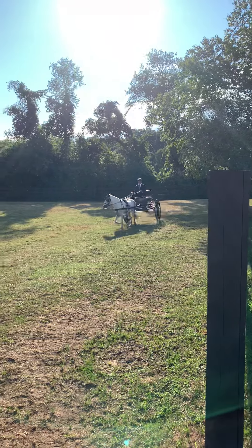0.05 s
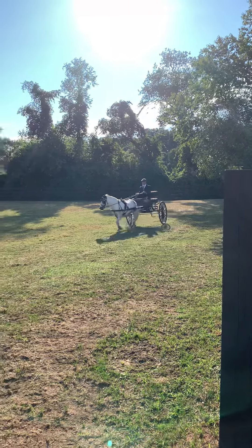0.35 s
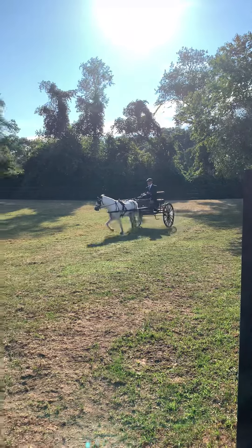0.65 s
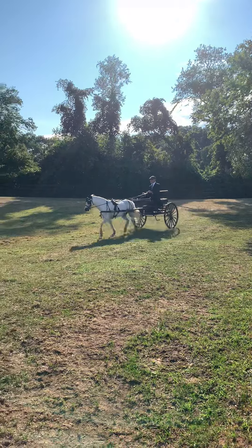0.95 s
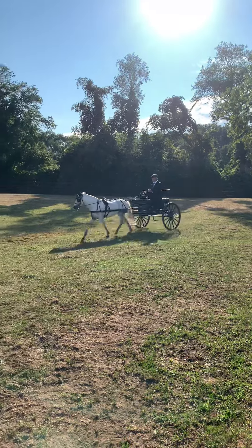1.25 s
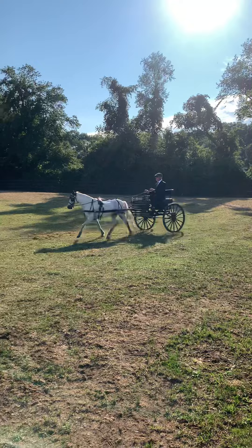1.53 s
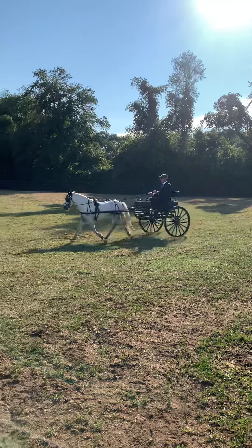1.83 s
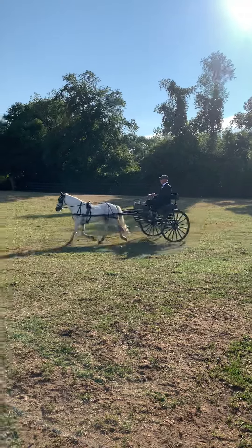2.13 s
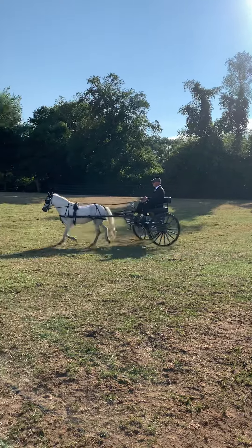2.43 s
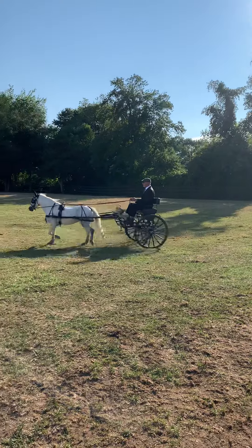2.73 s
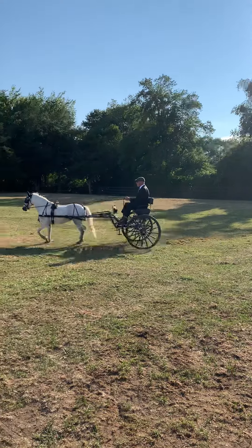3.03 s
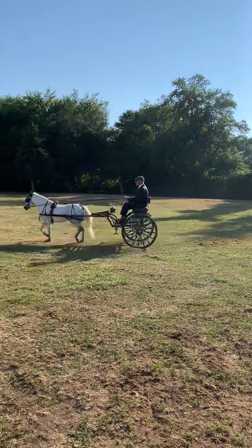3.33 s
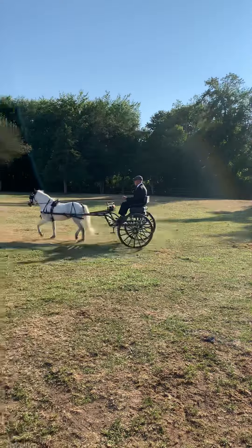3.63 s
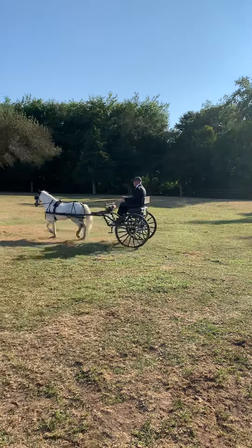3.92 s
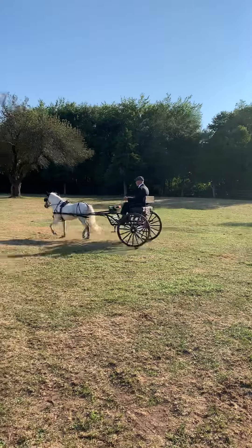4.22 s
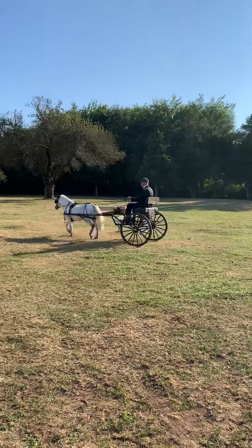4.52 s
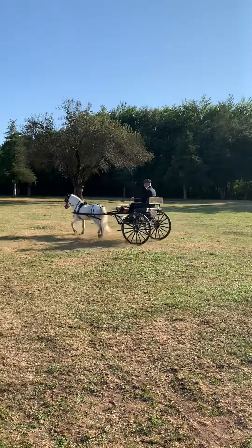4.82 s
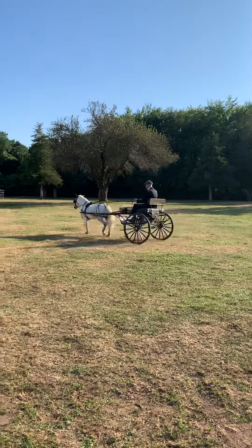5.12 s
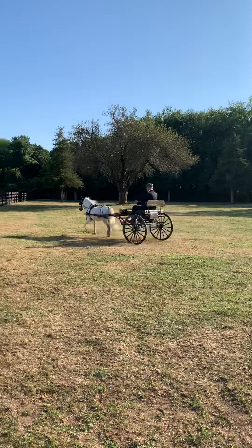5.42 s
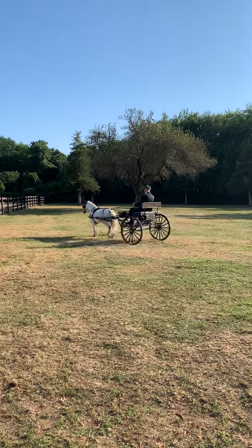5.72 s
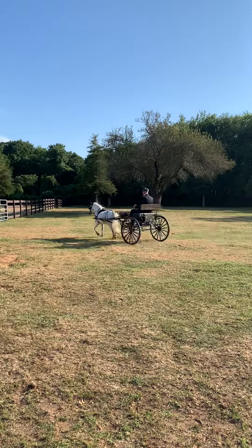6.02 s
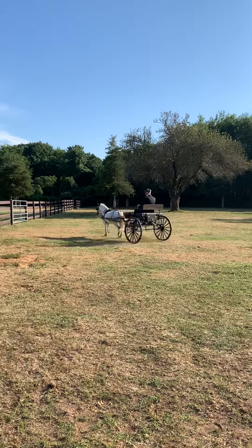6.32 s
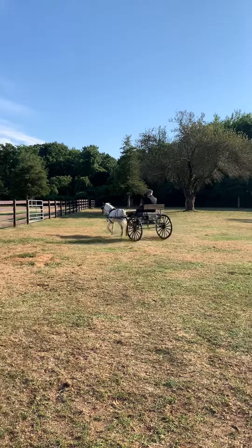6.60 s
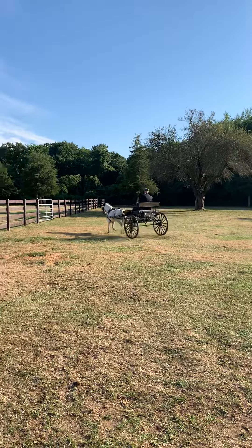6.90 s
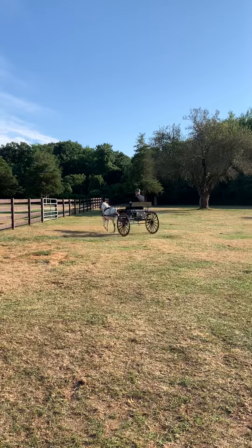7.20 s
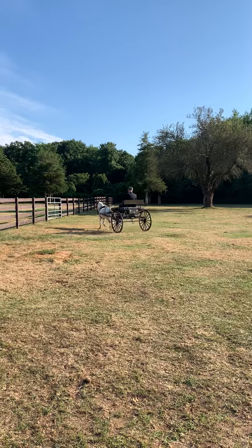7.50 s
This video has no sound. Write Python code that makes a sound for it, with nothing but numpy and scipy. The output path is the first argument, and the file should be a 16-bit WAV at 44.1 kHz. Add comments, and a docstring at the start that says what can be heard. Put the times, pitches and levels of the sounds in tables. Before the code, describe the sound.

Dull trotting hoof thuds, rattling cart knocks and chinking harness rings cross an open field while insects hiss softly.

```python
"""Pony and cart in a dry field

A pony trots at an even pace, drawing a two-wheeled cart past a hand-held microphone.
Every step thuds on the turf, shakes the harness rings and sets the cart clattering.
Dry stalks snap under hooves and wheels; bumps add harder knocks, thumps and spring squeaks.
Insects hiss in the hedges over a low outdoor rumble."""
import sys
import numpy as np
from scipy import signal
from scipy.fft import rfft, irfft
from scipy.io import wavfile
from scipy.ndimage import uniform_filter1d

SR = 44100
rng = np.random.default_rng(int(sys.argv[2]) if len(sys.argv) > 2 else 0)


def inscribe(sig):
    """Save sig as 16-bit PCM at rate SR to the path in sys.argv[1].

    A 1-D sig is mono; a 2-D sig holds one channel per row.
    Samples are clipped to [-1, 1] before scaling.
    """
    pcm = np.round(np.clip(np.atleast_2d(sig).T, -1, 1) * 32767)
    wavfile.write(sys.argv[1], SR, pcm.astype(np.int16))


N = 332955
TIME = np.arange(N) / SR
FIRST_STEP_S, STEP_S = 0.08, 0.3

# How heavily pony and cart sound on the turf. Each row: time in seconds, level in dB.
TURF_LEVEL = [(0, -50.5), (0.5, -45.5), (1.3, -49), (2.1, -47.5), (2.7, -50), (4.3, -54.5), (4.7, -52.5),
              (5.3, -52), (6, -55), (7.55, -51)]
# How loudly the wheels roll on rough and smooth ground. Each row: time in seconds, level in dB.
WHEEL_LEVEL = [(0.0, -67.5), (0.35, -59), (1.7, -57.5), (2.25, -63.5), (2.47, -53), (2.67, -76),
               (3.07, -55), (3.8, -59), (6.1, -69), (6.22, -58.5), (7.55, -69.5)]


def gain_of(db):
    """Turns decibels into a number to multiply by."""
    return 10 ** (np.asarray(db) / 20)


def evened(x):
    """Scales a sound to an average strength (rms) of 1."""
    return x / np.sqrt(np.mean(x ** 2) + 1e-20)


def peaked(x):
    """Scales a sound to a peak of 1."""
    return x / (abs(x).max() + 1e-20)


def at_hz(points, hz):
    """Reads a table between its frequencies, on a scale of octaves."""
    known_hz, value = np.transpose(points)
    return np.interp(np.log(hz + 1), np.log(known_hz + 1), value)


def level(curve, s):
    """Reads a level curve at the times s."""
    return np.interp(s, *np.transpose(curve))


def add(mix, s, sound):
    """Adds a sound into the mix at s seconds."""
    part = mix[max(round(s * SR), 0):][:len(sound)]
    part += sound[:len(part)]


def coloured(x, tone):
    """Turns each frequency up or down as the tone table says."""
    return irfft(rfft(x) * gain_of(at_hz(tone, np.fft.rfftfreq(N, 1 / SR))), N)


def drift(per_s):
    """A wandering curve that heads for a new random value per_s times a second."""
    targets = rng.standard_normal(1000)
    return evened(np.interp(TIME * per_s, np.arange(len(targets)), targets))


def stereo_noise(n, likeness):
    """Left and right noise: unrelated at likeness 0, the same at 1."""
    left, other = rng.standard_normal((2, n))
    return np.array([left, likeness * left + np.sqrt(1 - likeness ** 2) * other])


def arch(t, length, crest):
    """Swells and fades within length; a crest under 1 makes it peak early."""
    return np.sin(np.pi * np.minimum(t / length, 1) ** crest)


def random_kicks(n, per_s, spread_db, cap):
    """Spikes at random moments: many small, a few large."""
    sizes = gain_of(spread_db * np.minimum(rng.exponential(1, n), cap))
    return sizes * (rng.random(n) < per_s / SR)


def steps(lag_s, scatter_s, count=1):
    """Times of count events for each step of the trot, scattered around a short delay."""
    beat = np.repeat(FIRST_STEP_S + STEP_S * np.arange(25), count)
    return np.maximum(beat + lag_s + scatter_s * rng.standard_normal(len(beat)), 0)


def insects(level_db=-64.0, flutter_db=3.0):
    """A far chorus of many insects merges into a lightly fluttering hiss."""
    # The tone of the chorus. Each row: frequency in Hz, level in dB.
    tone = [(1500, -11), (3000, -11.5), (4200, -3), (5000, -6.5), (6200, -5), (7250, -5.5), (7620, 2.5),
            (7950, -2), (8400, -15), (10500, -11), (12500, -17), (15000, -21)]
    chorus = evened(coloured(stereo_noise(N, likeness=1.0), tone))
    return chorus * gain_of(level_db + flutter_db * drift(per_s=40))


def rumble(lump_db=3.5):
    """A lumpy low roll from the turf."""
    # The tone of the rumble. Each row: frequency in Hz, level in dB.
    tone = [(12, -40), (28, -14.5), (48, -2.5), (85, 2.5), (115, -4.5), (200, -7), (330, -15), (480, -29),
            (1000, -28.5), (3000, -59)]
    ground = evened(coloured(stereo_noise(N, likeness=0.92), tone))
    return ground * gain_of(level(TURF_LEVEL, TIME) + lump_db * np.tanh(drift(per_s=18)))


def wheels(clump_db=8.0, crunch_db=-3.0):
    """The rims crush clumps of dry grass."""
    # The tone of the crunch. Each row: frequency in Hz, level in dB.
    tone = [(150, 9.5), (330, 6.5), (460, 4), (620, 8), (780, 8), (1000, -3), (1600, 2), (2400, -7),
            (4000, -31), (6500, -15.5), (9000, -15.5), (12000, -34), (16000, -60)]
    stalks = random_kicks(N, per_s=600, spread_db=3.0, cap=4)
    crush = np.sqrt(abs(uniform_filter1d(stalks ** 2, size=160)))  # each gives way in a few milliseconds
    crunch = evened(coloured(crush * stereo_noise(N, likeness=0.88), tone))
    return crunch * gain_of(level(WHEEL_LEVEL, TIME) + crunch_db + clump_db * np.tanh(drift(per_s=40)))


def twigs(snap_s=0.0071, level_db=-15.5):
    """Stiff stems snap one by one under hooves and rims."""
    # The tone of the stems. Each row: frequency in Hz, level in dB.
    tone = [(500, -5), (900, 0), (1700, 0), (2400, 0), (3400, -6.5), (5000, -34), (7000, -0.5),
            (10000, -15.5), (12500, -39), (15000, -38)]
    breaks = random_kicks(N, per_s=45, spread_db=5.5, cap=2.5)
    fades = signal.lfilter([1], [1, -np.exp(-1 / (snap_s * SR))], breaks)
    snaps = evened(coloured(fades * rng.standard_normal(N), tone))
    return snaps * gain_of(level(TURF_LEVEL, TIME) + level_db)


def scrapes(level_db=8.5):
    """Hooves and rims drag through dry grass, making clumps of tiny cracks."""
    # The drags. Each row: start in seconds, length in seconds, relative level in dB.
    drags = [(0.439, 0.041, -49), (0.798, 0.044, -53), (0.894, 0.2, -53), (1.11, 0.1, -60),
             (5.031, 0.061, -50.5), (6.534, 0.13, -63.5), (6.967, 0.19, -64), (7.232, 0.051, -49.5),
             (7.298, 0.12, -51.5)]
    # The tone of dry grass. Each row: frequency in Hz, level in dB.
    tone = [(600, -20), (1500, -6.5), (2800, -6), (3100, -10), (3800, -7), (5000, -18), (7000, -16),
            (10000, -25), (13000, -36)]
    out, t = np.zeros(N), np.arange(8192) / SR
    for s, length, db in drags:
        breaks = random_kicks(len(t), per_s=900, spread_db=4.0, cap=3)
        cracks = np.sqrt(abs(uniform_filter1d(breaks ** 2, size=110))) * rng.standard_normal(len(t))
        scrape = evened(cracks * arch(t, length, crest=0.4))
        add(out, s, gain_of(db + level_db) * np.sqrt(length / t[-1]) * scrape)
    return coloured(out, tone)


def ticks(crack_s=0.0048, tail_s=0.023, level_db=10.5):
    """Buckles and dry stalks snap without ringing: a crack and a brief faint fizz."""
    # The sharpest snaps. Each row: start in seconds, relative level in dB.
    snaps = [(0.113, -44), (0.6482, -34), (0.9727, -41), (1.264, -38.5), (1.6, -50), (1.823, -44),
             (2.18, -46), (2.276, -52), (2.371, -43), (2.459, -47), (2.843, -34.5), (3.349, -45.5),
             (3.396, -51), (3.527, -52), (3.631, -60), (3.672, -43), (4.287, -46.5), (4.312, -49),
             (4.474, -47), (5.197, -45), (6.0875, -40), (7.232, -42), (7.464, -44)]
    # Their tone. Each row: frequency in Hz, boost or cut in dB.
    tone = [(1500, 5), (3000, 0), (5000, 2), (9000, -5.5), (12000, -5), (16000, -24)]
    out, t = np.zeros(N), np.arange(2000) / SR
    fade = np.exp(-(t / crack_s) ** 2) + np.exp(-t / tail_s) / 10
    for s, db in snaps:
        add(out, s, gain_of(db + level_db) * peaked(rng.standard_normal(len(t)) * fade))
    return coloured(out, tone)


def springs(sag=0.019, rasp=0.017, overtone_db=-22, grit_db=-11, level_db=-4.0):
    """The cart sways and a spring leaf slips unevenly: a gritty whistle that sags in pitch."""
    # The squeaks. Each row: start in seconds, length in seconds, pitch in Hz, relative level in dB.
    squeaks = [(1.397, 0.011, 3646, -40.5), (1.432, 0.039, 3470, -38.5), (1.712, 0.042, 3640, -38.5),
               (1.944, 0.014, 3550, -36.5), (2.019, 0.018, 3590, -35), (2.274, 0.091, 3290, -55),
               (2.573, 0.025, 3520, -42.5), (2.732, 0.056, 3100, -60.5), (2.816, 0.022, 3400, -36.5),
               (3.058, 0.018, 3440, -41.5), (3.38, 0.016, 3700, -36.5), (3.816, 0.022, 3470, -47),
               (3.83, 0.036, 3870, -48), (3.847, 0.021, 3380, -43), (4.037, 0.02, 3400, -46),
               (4.515, 0.014, 3500, -39.5), (4.733, 0.0086, 3574, -41), (5.666, 0.032, 3020, -49.5),
               (5.69, 0.042, 2550, -51), (6.54, 0.024, 3350, -57), (6.627, 0.028, 3500, -52.5),
               (6.865, 0.023, 3780, -50.5)]
    out = np.zeros(N)
    for s, length, hz, db in squeaks:
        progress = np.linspace(0, 1, max(int(length * SR), 100))
        n = len(progress)
        jitter, slips = (evened(uniform_filter1d(row, size=70)) for row in rng.standard_normal((2, n)))
        pitch_hz = hz * (1 + sag * (0.5 - progress) + rasp * jitter)
        phase = 2 * np.pi * np.cumsum(pitch_hz) / SR
        whistle = np.sin(phase) + gain_of(overtone_db) * np.sin(2 * phase)
        band = signal.butter(2, [0.78 * hz, 1.12 * hz], "bandpass", fs=SR)
        grit = evened(signal.lfilter(*band, rng.standard_normal(n)))
        swell = np.sin(np.pi * progress) * (1 + 0.35 * slips)
        add(out, s, gain_of(db + level_db) * swell * (whistle + gain_of(grit_db) * grit))
    return out


def harness(touches_per_s=85, flutter_db=8.0, wander=1.34, build_s=0.0011, low_db=-1.0, high_db=4.5):
    """A shake makes the steel rings touch many times; each touch rings unevenly and a bit off pitch."""
    # Single shakes of the harness, loud and faint. Each row: start and length in seconds, relative level in dB,
    # extra treble in dB.
    shakes = [(0.157, 0.1, -53.5, -10.5), (0.337, 0.045, -54, -24), (0.608, 0.14, -54, -11.5),
              (0.707, 0.062, -48, -5), (0.773, 0.08, -57, -3), (0.94, 0.09, -53.5, 0),
              (1.253, 0.044, -42.5, -11.5), (1.485, 0.091, -66, 1), (1.802, 0.085, -46.5, -6),
              (2.016, 0.081, -52, -16), (2.226, 0.03, -74, 11), (2.339, 0.11, -49, -10),
              (2.455, 0.018, -40.5, -12), (2.562, 0.062, -45, -8.5), (2.867, 0.069, -49, -9),
              (3.092, 0.057, -56.5, 5.5), (3.429, 0.081, -60.5, 1.5), (3.602, 0.041, -56, -18),
              (4.003, 0.25, -59.5, -3), (4.223, 0.055, -52.5, -9.5), (4.601, 0.21, -53.5, -13),
              (4.794, 0.11, -56, -17), (5.197, 0.16, -56, -22), (5.389, 0.2, -55, -10.5),
              (5.879, 0.15, -53.5, -13), (6.47, 0.094, -63, -29), (6.6, 0.021, -57, -10.5),
              (7.09, 0.05, -59, -9)]
    # The rings' notes. Each row: pitch in Hz, relative level in dB, seconds to fade by 60 dB.
    notes = [(3440, -20, 0.071), (4064, -0.5, 0.13), (4227, 7, 0.04), (4323, 6.5, 0.046),
             (9350, 4.5, 0.079), (9530, 4.5, 0.039), (11200, 9, 0.07), (11500, 1, 0.029),
             (14770, -7.5, 0.055)]
    # The rings also swing lightly at every step.
    swings = [(s, 0.12, level(TURF_LEVEL, s) - 13.5, -9.5) for s in steps(lag_s=0.018, scatter_s=0.024)]
    out, t = np.zeros(N), np.arange(14000) / SR
    for s, length, db, treble_db in shakes + swings:
        count = 1 + int(length * touches_per_s)
        when = length * (np.arange(count) + rng.random(count)) / count
        force = arch(when, length, crest=0.53)
        when[0], force[0] = 0.005, 0.91  # the chink that starts the shake
        lower, upper = np.zeros((2, len(t)))
        for hz, note_db, fade_s in notes:
            age = t[:int(fade_s * SR)]
            fade = gain_of(note_db - 60 * age / fade_s) * (1 - np.exp(-age / build_s))
            for at, push, (size, shift) in zip(when, force, rng.standard_normal((count, 2))):
                pitch_hz = hz + wander * shift / fade_s  # short notes stray further
                note = fade * np.sin(2 * np.pi * pitch_hz * age)
                add(lower if hz < SR / 8 else upper, at, push * gain_of(flutter_db * size) * note)
        jingle = gain_of(low_db) * evened(lower) + gain_of(treble_db + high_db) * evened(upper)
        add(out, s, gain_of(db) * np.sqrt(length / t[-1]) * jingle)
    return out


def footfalls(above_db=2.0, spread_db=4.0, thud_hz=150.0, octaves=0.32):
    """A fore and a hind hoof land almost together at each step; lists time, level and pitch."""
    s = steps(lag_s=0.01268, scatter_s=0.018, count=2)
    size, soil = rng.standard_normal((len(s), 2)).T
    db = level(TURF_LEVEL, s) + above_db + spread_db * size
    return list(zip(s, db, thud_hz * 2 ** (octaves * soil)))


def hooves(cycles=0.61, scuff=0.36, level_db=2.5):
    """Each hoof pushes the soil into a few dull wobbles, with a scuff of loose earth."""
    # Heavy thuds on the turf. Each row: start in seconds, relative level in dB, pitch in Hz.
    heavy_thuds = [(0.107, -41, 317), (0.279, -36, 89), (0.429, -35.5, 322), (0.689, -47, 83.5),
                   (0.934, -40, 98), (1.523, -41.5, 57.5), (1.687, -35.5, 145), (1.825, -38, 78),
                   (1.903, -41.5, 159), (1.995, -34, 57), (2.205, -40, 156), (2.458, -31.5, 170),
                   (2.487, -32.5, 155), (2.537, -34, 158), (2.897, -37, 150), (3.027, -38, 148),
                   (5.821, -43, 60), (6.1, -39.5, 157)]
    out, t = np.zeros(N), np.arange(8192) / SR
    soil = signal.butter(2, [90, 380], "bandpass", fs=SR, output="sos")
    for s, db, hz in heavy_thuds + footfalls():
        earth = evened(signal.sosfilt(soil, rng.standard_normal(len(t))))
        thud = (np.sin(2 * np.pi * hz * t) + scuff * earth) * t * np.exp(-t * hz / cycles)
        add(out, s, gain_of(db + level_db) * peaked(thud))
    return out


def clatter(above_db=10.0, spread_db=-1.5, lowest_hz=770.0, octaves=1.6):
    """Small knocks gather around each step, louder on rough ground; lists time, level and pitch."""
    s = steps(lag_s=0.02, scatter_s=0.065, count=7)
    size, place = rng.random((len(s), 2)).T
    db = level(WHEEL_LEVEL, s) + above_db + spread_db * size
    return list(zip(s, db, lowest_hz * 2 ** (octaves * place ** 2)))


def clack(age, centre_hz, lead_s=0.0027, swell_s=0.0032, top_hz=2087.0):
    """The faces of two boards meet: a woody burst of noise with no clear pitch."""
    progress = np.maximum(age + lead_s, 0) / swell_s
    bottom_hz = min(0.85 * centre_hz, top_hz / 1.45)
    wood = signal.butter(4, [bottom_hz, top_hz], "bandpass", fs=SR, output="sos")
    burst = signal.sosfilt(wood, rng.standard_normal(len(age)) * progress * np.exp(-progress))
    return burst * np.sqrt(SR / 100) / np.linalg.norm(burst)


def cart_body(t, centre_hz, focus_db, detune=0.014, rise_s=0.002, dull_hz=2950.0):
    """The boards ring; where the blow lands favours notes near one pitch and shifts each a little."""
    # The body's notes. Each row: pitch in Hz, width in Hz (wider fades sooner), relative level in dB.
    notes = [(162, 13.4, -1), (337.5, 32, 1), (640, 207, -2.5), (770, 110, -2), (872, 65, -1),
             (1134, 90, -6), (1200, 65, -10), (1377, 310, -4), (1541, 310, -2.5), (1658, 210, -5.5),
             (2120, 105, -8), (2630, 320, -5.5), (2750, 130, -10), (3650, 400, -6)]
    ring = np.zeros(len(t))
    for hz, width, db in notes:
        octaves_away = min(abs(np.log2(hz / centre_hz)), 1)
        weight = width * gain_of(db - focus_db * octaves_away)
        pitch_hz = hz * (1 + detune * rng.standard_normal())
        ring += weight * np.exp(-np.pi * width * t) * np.sin(2 * np.pi * (pitch_hz * t + rng.random()))
    ring *= 1 - np.exp(-t / rise_s)  # the blow needs a moment to spread through the boards
    return signal.lfilter(*signal.butter(2, dull_hz, fs=SR), ring)  # soft wood dulls the treble


def cart_knocks(graze_s=0.0023, contact_s=0.0043, rattle_s=0.025, chatter=0.062,
                usual_db=-37.5, clack_db=-10.0, level_db=-9.0):
    """Loose wooden parts graze, land with a clack that rings the cart body, and rattle on."""
    # Knocks from bumps. Each row: time in seconds, relative level in dB, favoured pitch in Hz.
    bumps = [(0.095, -39.5, 880), (0.337, -38, 890), (0.387, -38.5, 1130), (0.428, -24.5, 1030),
             (0.459, -34, 1080), (0.555, -41, 750), (0.641, -35.5, 800), (0.69, -54, 900),
             (0.835, -38.5, 1530), (0.903, -38.5, 795), (0.932, -32, 1230), (0.972, -29.5, 1010),
             (1.016, -35.5, 900), (1.236, -27.5, 1060), (1.332, -36.5, 830), (1.426, -49.5, 1400),
             (1.491, -40, 1070), (1.614, -36.5, 1490), (1.641, -40.5, 884), (1.691, -37, 1130),
             (1.71, -24, 1060), (1.778, -34, 1250), (1.818, -35, 840), (1.946, -27, 1370),
             (1.994, -26, 840), (2.026, -25, 1130), (2.134, -34, 786), (2.232, -34, 1190),
             (2.268, -33, 776), (2.302, -28.5, 824), (2.369, -27, 810), (2.416, -31.5, 750),
             (2.437, -27.5, 1210), (2.462, -44, 800), (2.491, -27, 820), (2.521, -28.5, 767),
             (2.537, -34.5, 1000), (2.567, -40, 895), (2.584, -30, 790), (2.635, -37, 835),
             (2.828, -34, 1200), (2.842, -18, 840), (2.872, -38, 1400), (2.889, -27, 796),
             (2.91, -32.5, 756), (2.954, -30.5, 810), (2.997, -23.5, 1530), (3.025, -44, 1530),
             (3.062, -34, 745), (3.089, -41, 756), (3.362, -39, 750), (3.409, -33, 774), (3.531, -40, 850),
             (3.578, -32.5, 780), (3.598, -33, 770), (3.673, -25.5, 805), (3.714, -35, 820),
             (3.936, -41, 830), (3.961, -29, 810), (4.037, -36, 740), (4.13, -28, 900), (4.198, -29, 872),
             (4.22, -50, 1100), (4.26, -39.5, 860), (4.294, -33, 860), (4.454, -44, 870), (4.48, -40, 870),
             (4.602, -31.5, 865), (4.629, -38, 845), (4.811, -38, 744), (4.913, -43.5, 860),
             (4.933, -37.5, 675), (5.039, -38.5, 700), (5.205, -42, 1510), (5.228, -33, 800),
             (5.24, -39, 1100), (5.3, -44, 1150), (5.764, -43.5, 1730), (5.796, -34.5, 870),
             (5.824, -40.5, 1300), (6.09, -30.5, 1520), (6.151, -33, 744), (6.25, -37.5, 720),
             (6.264, -39, 1290), (6.339, -32.5, 765), (6.397, -32, 790), (6.689, -35.5, 704),
             (6.777, -42, 855), (6.835, -40.5, 704), (6.973, -37.5, 675), (6.992, -41, 1490),
             (7.038, -34, 740), (7.229, -36, 755), (7.307, -47, 1700), (7.331, -35.5, 740),
             (7.37, -40, 619), (7.466, -37.5, 790)]
    out, t = np.zeros((2, N)), np.arange(8192) / SR
    landing = SR // 250  # samples of grazing before the part lands
    age = t - landing / SR
    contact = np.exp(np.minimum(age, 0) / graze_s - (np.maximum(age, 0) / contact_s) ** 2)
    for s, db, centre_hz in list(bumps) + clatter():
        hard_db = max(db - usual_db, 0)  # a hard blow wakes more notes and stands out from its rattle
        blow = chatter * rng.standard_normal(len(t)) * contact
        blow[landing] += 1
        rattle_fade = (age > 0) * gain_of(-4.5 - 0.48 * hard_db) * np.exp(-t / rattle_s)
        rattle = chatter * rattle_fade * stereo_noise(len(t), likeness=0.69)
        ring = cart_body(t, centre_hz, focus_db=14.0 - 0.19 * hard_db)
        knock = signal.fftconvolve(blow + rattle, ring[None], axes=1)[:, :len(t)]
        knock /= knock[:, landing:landing + SR // 100].std()  # strength 1 just after landing
        knock += gain_of(clack_db) * clack(age, centre_hz)
        for channel, sound in zip(out, knock):
            add(channel, s - landing / SR, gain_of(db + level_db) * sound)
    return out


def field_echo(x, fade_s=0.15, echo_db=-11.0):
    """Turf and hedges scatter a faint dull echo, different on the left and right."""
    t = np.arange(SR // 2) / SR
    tail = rng.standard_normal((2, len(t))) * gain_of(-60 * t / fade_s)
    tail = signal.lfilter(*signal.butter(1, 4000, fs=SR), tail)
    tail /= np.linalg.norm(tail[0])
    return x + gain_of(echo_db) * signal.fftconvolve(x, tail, axes=1)[:, :N]


def scene():
    """Pony and cart in the open field; only the short sounds get an echo."""
    short_sounds = cart_knocks() + harness() + ticks() + scrapes() + twigs() + springs() + hooves()
    return field_echo(short_sounds) + wheels() + rumble() + insects()


def record(dry, top_hz=15900):
    """The microphone's two openings differ in timing and level; the highest treble is cut off."""
    # How far the left wave runs ahead. Each row: frequency in Hz, lead in radians.
    left_lead = [(390, -.1), (620, -2.8), (740, -5.1), (1100, -6.2), (1400, -5.4), (2150, -5.2),
                 (2400, -3.3), (2800, -5.4), (4100, -5.1), (4800, -3.4), (5400, -3.0), (7700, -.1),
                 (9000, .1), (11700, 3.1), (13500, 3.2), (15000, 6.1)]
    # The balance of the two sides. Each row: frequency in Hz, left minus right in dB.
    balance = [(60, 0), (260, -5), (430, 0), (700, -8), (980, -2.5), (1250, -5.5), (1550, 0.5), (2200, -4),
               (2700, 1), (3100, -2.5), (4300, 0), (8000, 0)]
    hz = np.fft.rfftfreq(N, 1 / SR)
    lean = gain_of(at_hz(balance, hz) / 2)
    sides = np.array([lean * np.exp(1j * at_hz(left_lead, hz)), 1 / lean])
    heard = irfft(rfft(dry) * sides, N)
    treble_cut = signal.firwin(511, top_hz, window=("kaiser", 9), fs=SR)
    return signal.oaconvolve(heard, treble_cut[None], "same")


dry = scene()
out = record(dry)
inscribe(out)
```